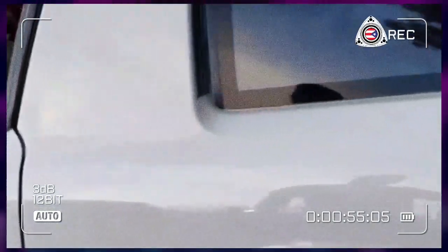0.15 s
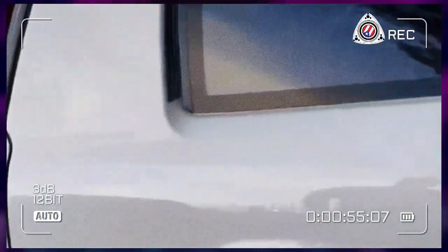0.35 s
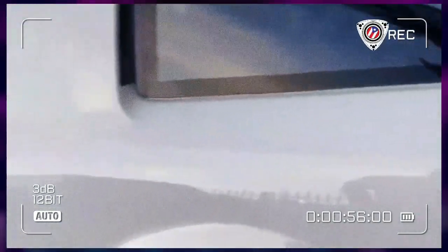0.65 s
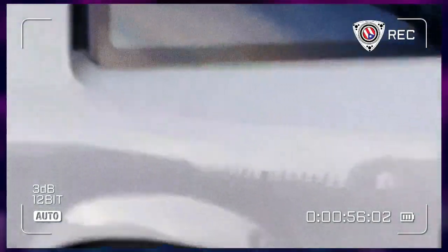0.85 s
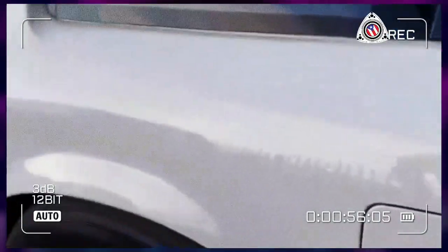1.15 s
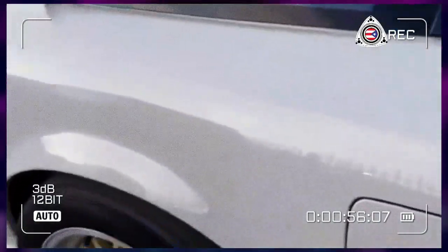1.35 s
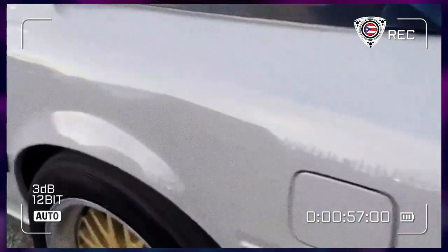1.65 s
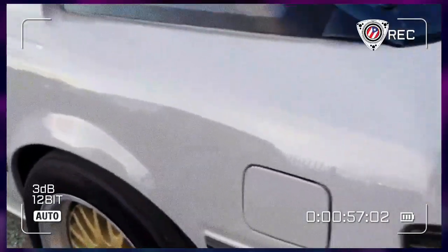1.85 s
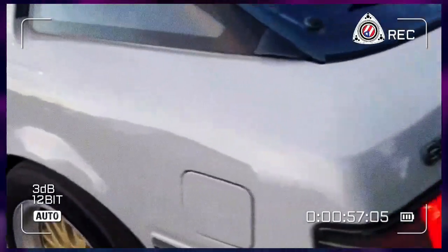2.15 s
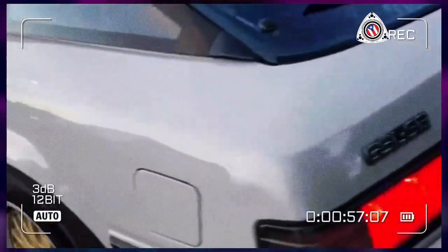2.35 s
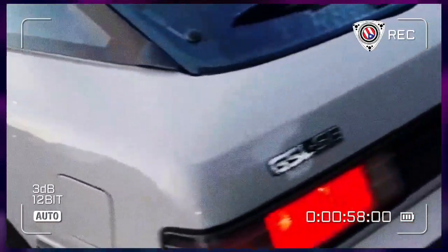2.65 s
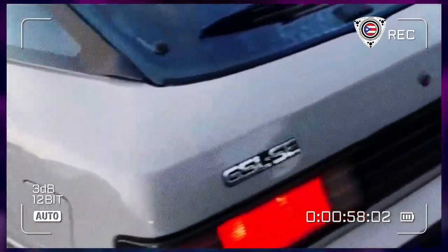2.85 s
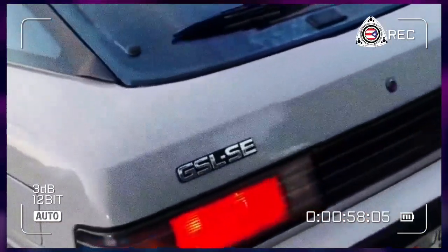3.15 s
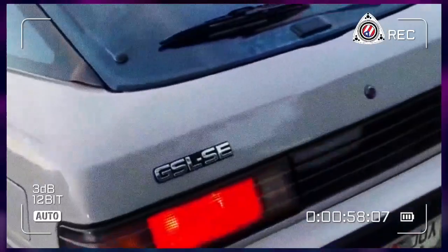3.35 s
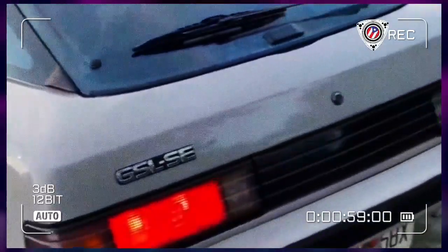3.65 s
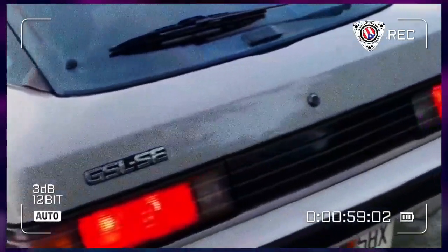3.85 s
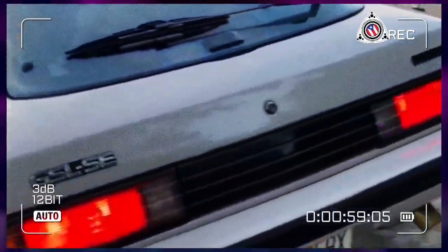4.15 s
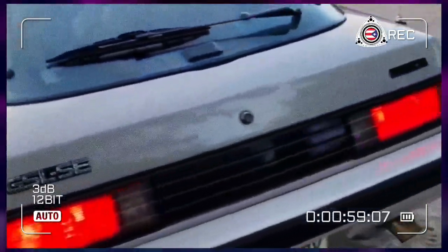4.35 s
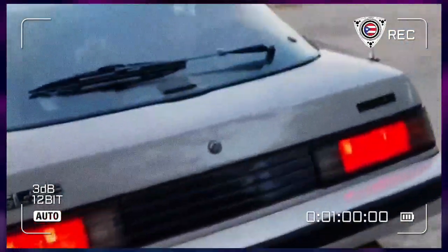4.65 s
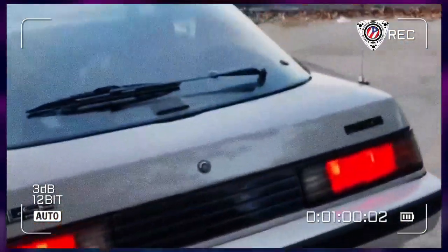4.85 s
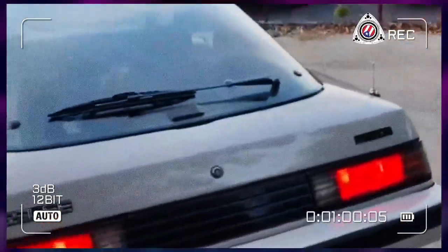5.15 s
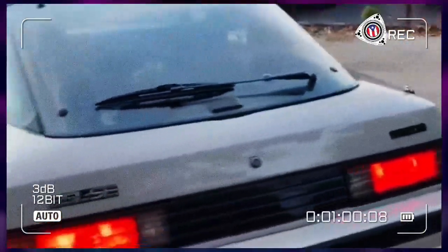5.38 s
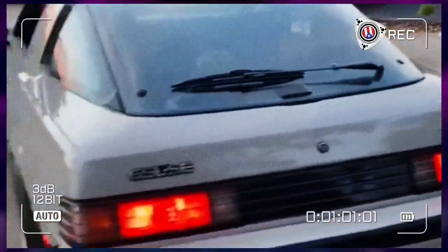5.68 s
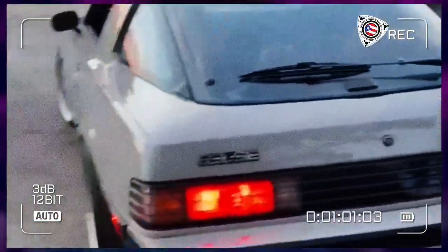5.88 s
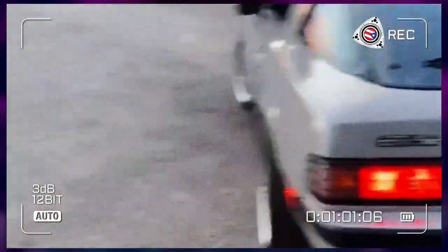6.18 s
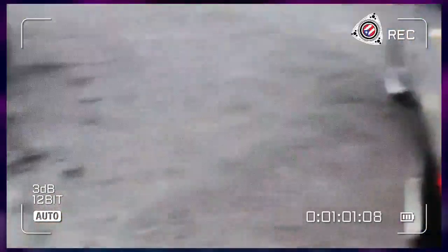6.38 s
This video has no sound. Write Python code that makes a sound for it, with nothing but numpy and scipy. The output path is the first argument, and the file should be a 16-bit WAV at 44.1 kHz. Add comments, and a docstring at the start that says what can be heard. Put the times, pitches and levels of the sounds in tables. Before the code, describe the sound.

A two-rotor car engine idles with a fast, loping, throaty burble about six times a second, growing louder toward the tail pipe, then cutting off.

```python
"""At the flank of a car and on round to its tail pipe, a two-rotor engine lopes at idle, six times a second.
A run of chambers fires, then the next few misfire; firing and misfiring pulses both ring the exhaust pipe.
Filtered noise makes the turbulent gas: a rasp in the pipe, a roar and a hiss that swell with the firing.
The microphone's walk shifts levels, roar colour and pipe tuning from flank to tail."""
import sys
import numpy as np
from scipy import signal
from scipy.fft import rfft, irfft, next_fast_len
from scipy.io import wavfile
from scipy.ndimage import uniform_filter1d

SR = 44100
rng = np.random.default_rng(int(sys.argv[2]) if len(sys.argv) > 2 else 0)


def output_pcm(signal):
    """Save a mono or channel-first signal as 16-bit PCM at the path in sys.argv[1].

    Samples are clipped to [-1, 1] before scaling.
    """
    pcm = np.clip(np.atleast_2d(signal).T, -1, 1) * 32767
    wavfile.write(sys.argv[1], SR, np.round(pcm).astype(np.int16))


def volts_from_db(level):
    """Convert decibel levels to linear amplitude ratios."""
    exponent = np.asarray(level, float) / 20
    return 10 ** exponent


N = 287527
TIME_S = np.arange(N) / SR
END_S = 6.4167

# lopes of the idle: start_s [s], misfires that end the lope [count]
LOPES = [(-0.118, 5), (0.0506, 4), (0.2217, 4), (0.3932, 4), (0.5649, 4), (0.7346, 4), (0.9039, 4),
         (1.0724, 3), (1.2244, 4), (1.4101, 4), (1.5814, 3), (1.75, 4), (1.9151, 4), (2.0816, 4),
         (2.2479, 4), (2.4112, 4), (2.5763, 4), (2.7389, 4), (2.9021, 4), (3.066, 3), (3.2252, 4), (3.4, 4),
         (3.5751, 5), (3.7512, 4), (3.9235, 4), (4.0782, 5), (4.2491, 4), (4.4146, 5), (4.5808, 4),
         (4.7453, 3), (4.9111, 3), (5.0594, 4), (5.221, 4), (5.366, 4), (5.5279, 4), (5.6913, 3),
         (5.864, 3), (5.9968, 2), (6.1277, 3), (6.319, 4), (6.495, 1)]
# exhaust modes: flank_hz [Hz], width_hz [Hz], then signed relative gains: steady_flank, steady_tail,
# misfire_flank, misfire_tail, first_flank, first_tail [linear]
PIPE_MODES = [(58.2, 9.2, 4.71, 4.06, -3.83, -1.53, 2.89, 4.23),
              (66.2, 10.1, 1.53, -1.44, 3.86, 4.21, 2.94, -0.44),
              (81.0, 27.3, -8.75, -6.06, 1.56, -2.59, -9.81, -8.04),
              (118.5, 8.5, -0.21, -0.39, -0.29, -0.47, 0.15, -1.08),
              (138.3, 16.8, 4.42, 2.33, -0.44, -1.37, 6.38, 4.67),
              (190.2, 50.0, 1.5, 1.53, 0.12, 0.15, 1.46, 1.22),
              (212.6, 11.5, -0.1, -0.16, -0.14, 0.09, -0.79, -0.55),
              (248.7, 20.7, 1.83, 0.35, 0.37, 0.09, 1.25, 0.32),
              (293.0, 24.0, -0.42, -0.2, -0.22, 0.04, 1.24, 0.16),
              (369.6, 18.2, 0.13, 0.37, 0.07, -0.09, 0.55, 0.34),
              (437.9, 50.0, 0.23, 0.24, 0.01, -0.03, 0.65, 0.26)]
# walk round the car, before the lope moves the levels:
# time_s [s], note_db [dB], upper_db (upper modes' extra gain) [dB], roar_db [dB], hiss_db [dB]
WALK = [(0, -18, 3, -39, -39.5), (1, -14.5, 1.1, -38.5, -39), (2, -12.5, 1.5, -37.5, -41),
        (3, -12, 5, -38.7, -41.5), (4, -10.5, 0.5, -36.5, -38.5), (5, -9, -1, -36, -37.5),
        (6.4, -9.5, -1.7, -32.5, -35.5)]
# relative roar spectrum at the flank: pitch_hz [Hz], level_db [dB per Hz]
FLANK_ROAR = [(280, -19), (480, -1), (537, -6.5), (711, -3), (933, -13), (1130, -10), (1240, -12.5),
              (1780, -13), (1900, -8.5), (2030, -17), (2230, -12), (2470, -20), (2790, -16.5), (3270, -22),
              (4500, -26), (5850, -32), (9900, -120)]
# relative roar spectrum at the tail: pitch_hz [Hz], level_db [dB per Hz]
TAIL_ROAR = [(280, -32), (480, -1.5), (672, -1), (819, 0), (987, -3), (1170, -1.5), (1340, -7.5),
             (1750, -3), (2070, -9), (2790, -13.5), (3300, -19), (4500, -18), (5850, -43.5), (9900, -120)]
# left-right likeness of the roar: pitch_hz [Hz], likeness [-1 to 1]
ROAR_ALIKE = [(60, 0.64), (170, 1), (510, 0.64), (1480, 1), (4310, 0.95), (12600, -0.1)]
# left-right lean of the roar: pitch_hz [Hz], left_over_right_db [dB]
LEFT_LEAN = [(360, -2), (640, 2.6), (1170, 1), (2110, -0.5)]
# relative hiss spectrum: pitch_hz [Hz], level_db [dB per Hz]
HISS = [(1650, -24.5), (2800, -9.5), (3350, -11), (4280, -9.5), (4830, -13.5), (5600, -4), (8560, -4),
        (9250, -3), (9990, 3.5), (10400, 1.5), (12000, -7.5), (12600, -17), (13000, -26)]
# left-right likeness of the hiss: pitch_hz [Hz], likeness [-1 to 1]
HISS_ALIKE = [(3000, 0.39), (6000, 0.48), (9000, 0.26), (11500, 0.27), (12500, 0.75)]
# pipe modes that turbulent gas excites: pitch_hz [Hz], width_hz [Hz],
# relative flank_db [dB], relative tail_db [dB]
RASP_MODES = [(89.8, 32.6, 11, 7.5), (160.7, 38, 2, 9), (264, 59, -1, -1.5), (345.7, 42, -12.5, -5.5),
              (380.5, 17.6, 1.5, -3.5), (436.2, 9.4, 4.5, -3.5)]
# the microphone rounds the corner of the car: from_s, to_s [s]
CORNER_S = [2, 3.93]

# chambers passing the exhaust port each second at the start, and how fast the idle speeds up
CHAMBER_HZ, SPEEDUP_HZ_PER_S = 58, 1.7
RASP_DB = -14.5  # relative to the level set for the upper pipe modes
FLANK_DEPTH_DB, TAIL_DEPTH_DB = 15, 9.5  # how deeply the hiss pulses with the lope
# the hiss comes from the front of the car, which the walk leaves behind
HISS_RECEDES_M, SOUND_M_PER_S = 3.5, 310


def unit(x):
    """Scaled to rms 1."""
    return x / np.sqrt(np.mean(x ** 2) + 1e-20)


def along(points, hz):
    """Reads (Hz, value) points on a log frequency axis."""
    f, v = np.transpose(points)
    return np.interp(np.log(hz + 1), np.log(f + 1), v)


def curves(rows):
    """One value per sample for each column after the time."""
    s, *cols = np.transpose(rows)
    return [np.interp(TIME_S, s, c) for c in cols]


def filtered(x, response):
    """x times a complex response of frequency."""
    m = next_fast_len(x.shape[-1] + SR // 2)
    return irfft(rfft(x, m) * response(np.fft.rfftfreq(m, 1 / SR)), m)[..., :x.shape[-1]]


def rush(spectrum, alike, patchy_db, lead_s):
    """Stereo noise of rms 1 with patches of random gain; the left side hears it lead_s early."""
    z = signal.stft(rng.standard_normal((2, N)), nperseg=512)[2]
    field = rng.standard_normal(z.shape[1:])
    field = uniform_filter1d(uniform_filter1d(field, size=6, axis=0), size=6, axis=1)
    pair = signal.istft(z * volts_from_db(patchy_db * unit(field)), nperseg=512)[1][:, :N]

    def mid_side(hz):
        # this angle between mid and side sets the left-right likeness
        turn = np.arccos(np.clip(along(alike, hz), -1, 1)) / 2
        return volts_from_db(along(spectrum, hz)) * [np.cos(turn), np.sin(turn)]

    mid, side = filtered(pair, mid_side)
    stereo = np.array([mid + side, mid - side])
    return unit(filtered(stereo, lambda hz: np.exp(1j * np.pi * lead_s * np.outer([1, -1], hz))))


def chambers(surge, growth, scatter_db):
    """Impulse trains of steady firings, misfires and first firings, from one second before the start."""
    trains = np.zeros((3, N + 2 * SR))
    for (s, misfires), (following, _) in zip(LOPES, LOPES[1:]):
        count = round((following - s) * (CHAMBER_HZ + SPEEDUP_HZ_PER_S * s))
        k = np.arange(1, count)
        # the shaft is slowest as the burn begins and fastest as it ends; chamber 0 passes silently
        share = k / count + surge * np.sin(2 * np.pi * k / count) / (2 * np.pi)
        at = np.round((1 + s + share * (following - s)) * SR).astype(int)
        kind = np.where(k >= count - misfires, 1, np.where(k == 1, 2, 0))
        size = np.where(kind == 0, 1 + growth * k, 1)
        trains[kind, at] = size * volts_from_db(scatter_db * rng.standard_normal(16)[k])
    return trains


def outflow(fired, delay_s, rise_s, fall_s):
    """Gas flow, about 0 to 1: every fired chamber adds a puff that rises and dies."""
    def puff(f):
        delay = np.exp(-2j * np.pi * f * delay_s)
        return delay / (1 + 2j * np.pi * f * rise_s) / (1 + 2j * np.pi * f * fall_s)

    flow = filtered(fired, puff)[SR:SR + N]
    return flow / np.percentile(flow, 90)


def hiss(steady, first, level_db):
    """Jet noise that starts at once with the first firing and sags along the run."""
    flow = outflow(0.65 * steady + 2.76 * first, delay_s=-0.013, rise_s=0.0065, fall_s=0.027)
    burning = np.tanh(1.61 * flow)
    # growing distance makes the swells arrive later and later
    lag_s = TIME_S / END_S * HISS_RECEDES_M / SOUND_M_PER_S
    burning = np.interp(TIME_S - lag_s, TIME_S, burning)
    depth_db = np.interp(TIME_S, CORNER_S, [FLANK_DEPTH_DB, TAIL_DEPTH_DB])
    jet = rush(HISS, HISS_ALIKE, patchy_db=3.5, lead_s=-0.0001687)
    return volts_from_db(level_db + depth_db * (burning - 0.34)) * jet


def roar(steady, first, puffs, corner, level_db):
    """Turbulent gas noise, swelling with the flow, that changes colour round the corner of the car."""
    flank = rush(FLANK_ROAR, ROAR_ALIKE, patchy_db=2.0, lead_s=0)
    tail = rush(TAIL_ROAR, ROAR_ALIKE, patchy_db=1.5, lead_s=0)
    colour = np.cos(corner) * flank + np.sin(corner) * tail
    colour = filtered(colour, lambda hz: volts_from_db(np.outer([.5, -.5], along(LEFT_LEAN, hz))))
    # single firings come through as a flutter near the tail pipe
    firings = outflow(steady + first, delay_s=0.0019, rise_s=0.0018, fall_s=0.0057)
    flutter = np.arange(N) / N * (firings - .3)
    return volts_from_db(level_db + 2.67 * (puffs - 0.81) + 2.6 * flutter) * colour


def rasp(puffs, corner, depth_db):
    """Turbulence inside the pipe keeps its modes singing unevenly, most while chambers fire."""
    hz, width, *db = np.transpose(RASP_MODES)[:, :, None]

    def modes(f):
        resonance = f * width / np.abs(hz * hz - f * f + 1j * f * width)
        return (volts_from_db(db) * resonance ** 2).sum(axis=1)

    flank, tail = filtered(rng.standard_normal(N), modes)
    singing = np.cos(corner) ** 2 * flank + np.sin(corner) ** 2 * tail
    return unit(volts_from_db(depth_db * (puffs - .6)) * singing)


def exhaust(trains, level_db, upper_db, warming, blowdown_hz):
    """Port blowdown pulses ring the pipe; faster running warms the gas and lifts every mode."""
    cool_hz, width, *gains = np.transpose(PIPE_MODES)[:, :, None]
    near = TIME_S / END_S
    parts = np.zeros((2, N))  # lower and upper modes
    # crossfade from the flank's pipe to the warmer one at the tail
    for place, share in enumerate([1 - near, near]):
        hz = cool_hz * (1 + warming * place)
        for train, gain in zip(trains, gains[place::2]):
            def split(f):
                modes = gain * hz / (hz * hz - f * f + 1j * f * width) / (1 + 1j * f / blowdown_hz)
                return [modes[:7].sum(axis=0), modes[7:].sum(axis=0)]

            parts += share * filtered(train, split)[:, SR:SR + N]
    lower, upper = parts
    note = volts_from_db(level_db) * (lower + volts_from_db(upper_db) * upper) / np.std(parts.sum(axis=0))
    # the silencer takes the click off every pulse
    return filtered(note, lambda hz: 1 / (1 + (hz / 530) ** 8))


def scene():
    """Pipe note and rasp in the middle, roar and hiss in stereo swelling with the gas flow."""
    note_db, upper_db, roar_db, hiss_db = curves(WALK)
    trains = chambers(surge=.038, growth=.013, scatter_db=.8)
    steady, _, first = trains
    puffs = outflow(steady + 1.5 * first, delay_s=-0.0089, rise_s=0.00085, fall_s=0.023)
    corner = np.interp(TIME_S, CORNER_S, [0, np.pi / 2])  # flank to tail
    gas = hiss(steady, first, hiss_db) + roar(steady, first, puffs, corner, roar_db)
    pipe_rasp = volts_from_db(note_db + upper_db + RASP_DB) * rasp(puffs, corner, depth_db=6.0)
    note = exhaust(trains, note_db, upper_db, warming=.046, blowdown_hz=900)
    return note + pipe_rasp + gas


def low_pass(x):
    """Removes everything above the highest recorded frequency."""
    return signal.sosfilt(signal.butter(12, 13150, fs=SR, output="sos"), x)


def record(dry):
    """The input rounds the highest peaks off and the sound stops abruptly."""
    rounded = dry / (1 + np.abs(dry / .95) ** 6) ** (1 / 6)
    mix = rounded * (np.arange(N) < END_S * SR)
    return low_pass(mix)


dry = scene()
out = record(dry)
output_pcm(out)
```